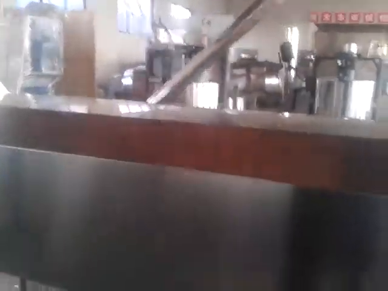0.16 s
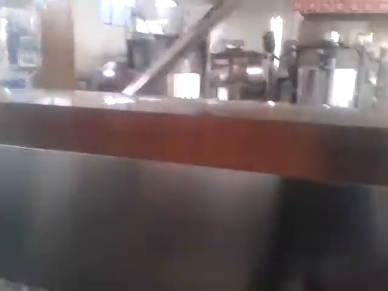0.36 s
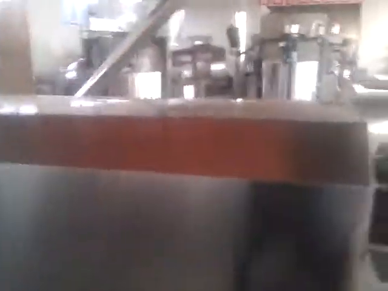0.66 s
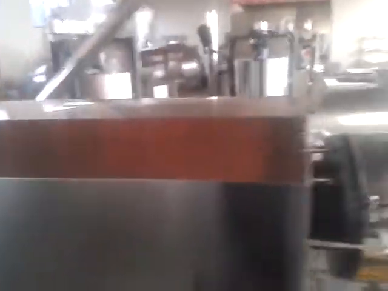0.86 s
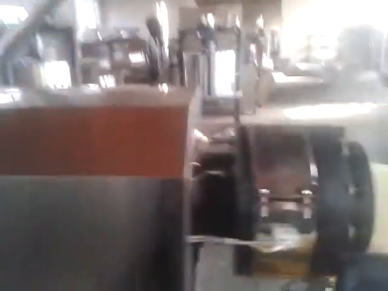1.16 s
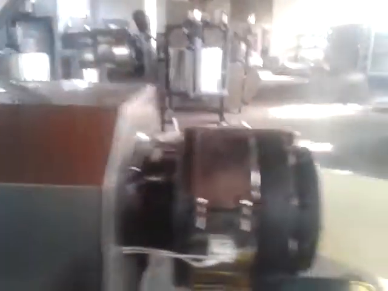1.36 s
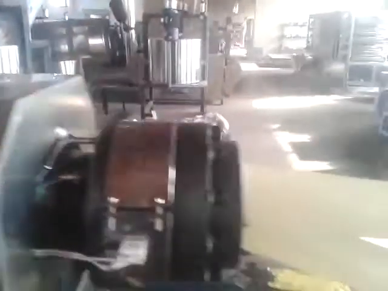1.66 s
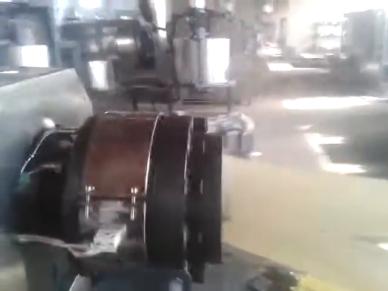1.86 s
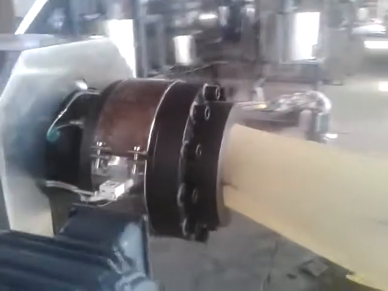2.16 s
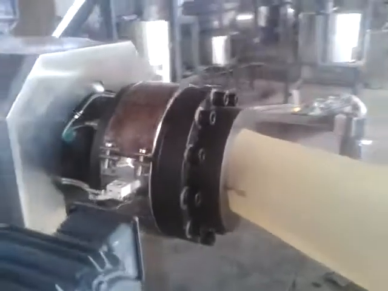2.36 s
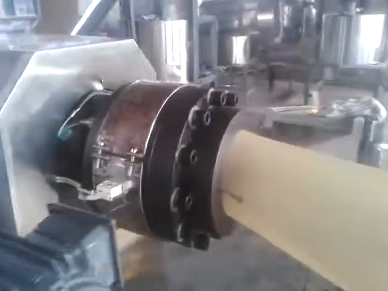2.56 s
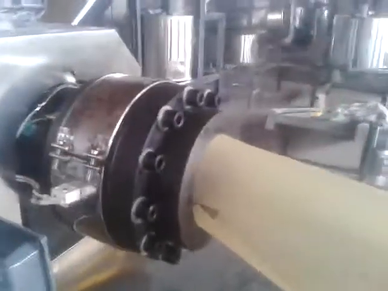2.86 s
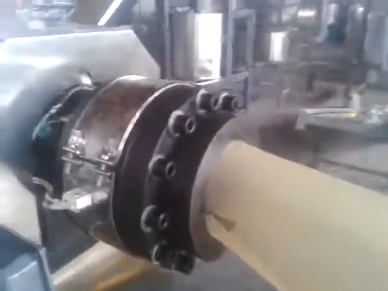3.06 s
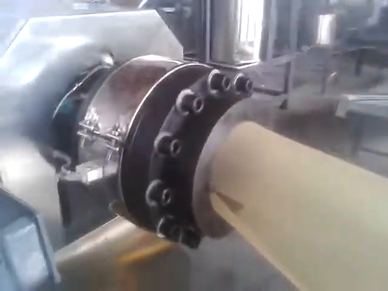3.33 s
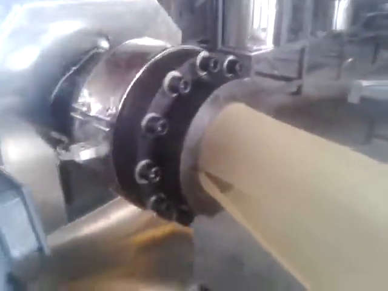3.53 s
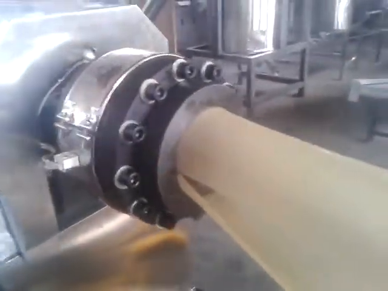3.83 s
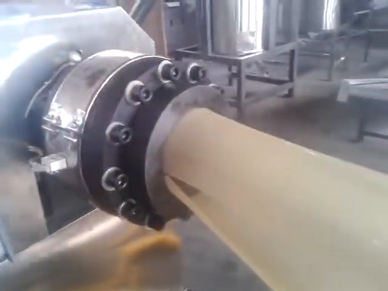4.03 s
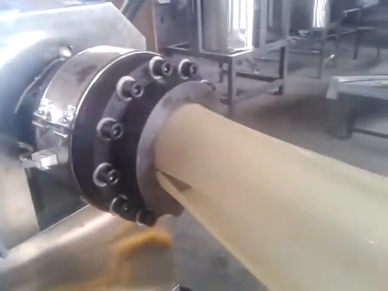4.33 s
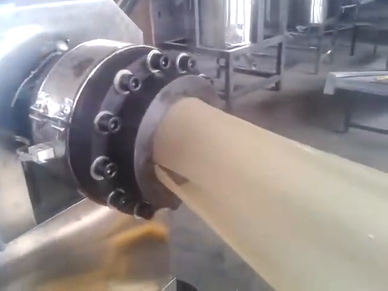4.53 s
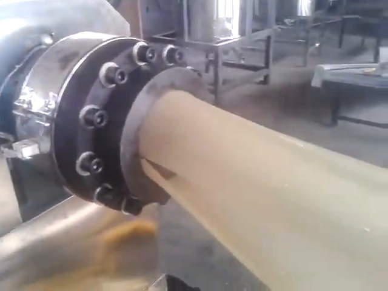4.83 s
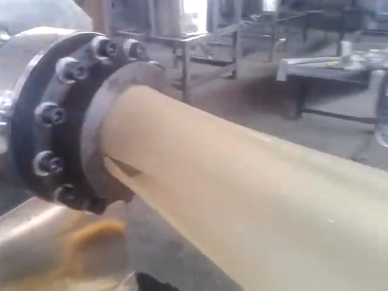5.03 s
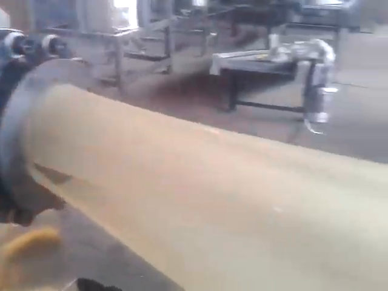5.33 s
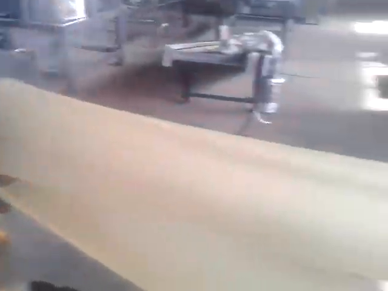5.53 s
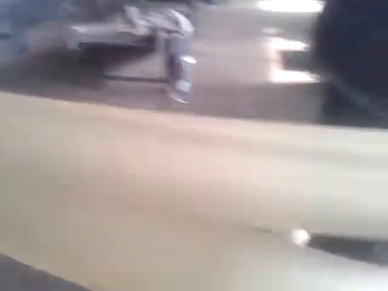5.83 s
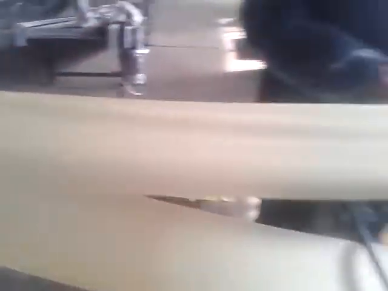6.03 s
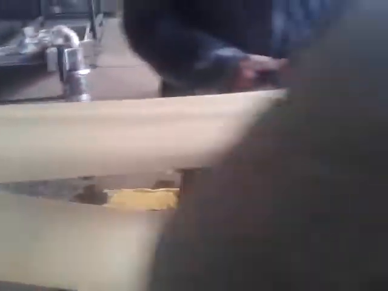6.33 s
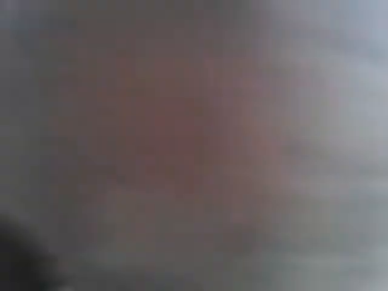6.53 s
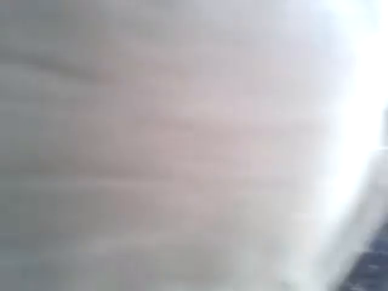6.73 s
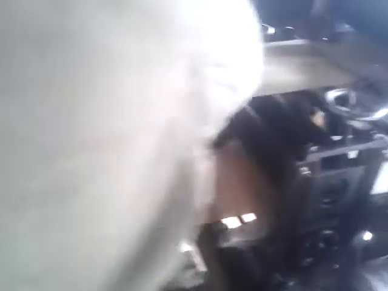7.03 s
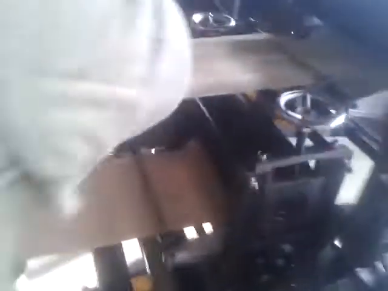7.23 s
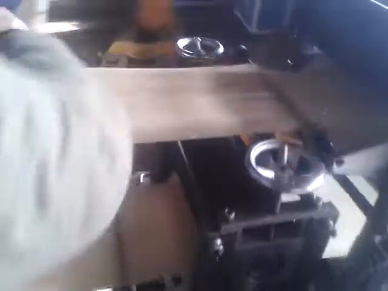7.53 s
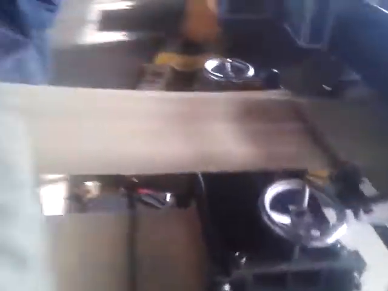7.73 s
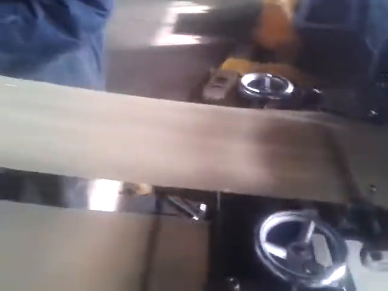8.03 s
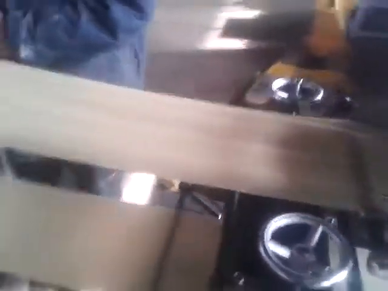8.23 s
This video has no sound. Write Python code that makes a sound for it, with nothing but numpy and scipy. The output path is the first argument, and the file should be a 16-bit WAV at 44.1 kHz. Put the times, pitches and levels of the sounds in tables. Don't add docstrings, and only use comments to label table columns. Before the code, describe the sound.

Continuous loud machinery indoors, captured by a walking phone with thin bass, hard limiting and tiny overload ticks. A piercing electric whine dominates, its tones shimmering unevenly, over a swelling gear hum and rumbling roar. Taps and dull clanks sound distantly around three seconds and again after five. Late on, a higher motor whine and brighter hiss join.

```python
import sys
import numpy as np
from scipy import signal
from scipy.fft import rfft, irfft
from scipy.io import wavfile
from scipy.ndimage import uniform_filter1d, minimum_filter1d

SR = 44100
rng = np.random.default_rng(int(sys.argv[2]) if len(sys.argv) > 2 else 0)


def persist_wave(psi):
    counts = np.round(np.clip(psi, -1, 1) * 32767).astype(np.int16)
    wavfile.write(sys.argv[1], SR, np.atleast_2d(counts).T)


def gain_from_db(level_db):
    decades = np.asarray(level_db, float) / 20
    return 10 ** decades


N = 369988
FRAMES, PAD = 2048, 8192
AIM_MEAN_DB = -42


def column(rows, t):
    s, *values = np.transpose(rows)
    return [np.interp(t, s, v) for v in values]


def read(points, hz):
    f, value = np.transpose(points)
    return np.interp(np.log(hz + 1), np.log(f + 1), value)


def evened(x):
    return x / np.sqrt(np.mean(x ** 2) + 1e-20)


def slow_times():
    return (np.arange(FRAMES) * (N + 2 * PAD) / FRAMES - PAD) / SR


def turned(t):
    turn_s, turn_length_s = 6.44, 0.41
    return .5 + .5 * np.tanh(2 * (t - turn_s) / turn_length_s)


def aim(t):
    # (time [s], level [dB])
    aim_curve = [(0.0, -33), (0.11, -47), (0.21, -36), (0.77, -38), (0.82, -31.5), (0.96, -39), (2.71, -41),
                 (3.9, -38), (3.99, -44), (4.81, -42), (5.61, -39.5), (5.93, -42), (8.3, -46), (8.39, -44)]
    return column(aim_curve, t)[0] - AIM_MEAN_DB


def sway(t, depth_db, top_rate):
    rates = np.geomspace(top_rate / 10, top_rate, num=24)[:, None]
    waves = np.sin(2 * np.pi * (rates * t + rng.random((24, 1))))
    return depth_db * evened((waves / np.sqrt(rates)).sum(0))


def noise(db_field, patchy_db):
    frames, hz = N // 256 + 5, np.fft.rfftfreq(1024, 1 / SR)
    a, b, patches = rng.standard_normal((frames, 513, 3)).T
    patches = uniform_filter1d(patches, size=8, axis=0)
    patches = evened(uniform_filter1d(patches, size=20, axis=1))
    level_db = db_field(hz[:, None], np.arange(frames) * 256 / SR) + patchy_db * patches
    z = (a + 1j * b) * gain_from_db(level_db)
    return signal.istft(z, nperseg=1024, noverlap=768)[1][:N]


def tones(lines, level_db, haze_db, direct=0.21, haze_hz=25, count=8):
    # (time [s], speed [m/s])
    walk = [(0, .4), (1.2, .35), (2.2, .24), (3.5, .2), (3.9, .025), (5.4, .025), (5.9, .3), (6.5, .5),
            (7.1, .3), (7.5, .1), (8.39, .1)]
    sound_speed = 343
    t, size = slow_times(), N + 2 * PAD
    hz, db = np.transpose(lines)
    metres = np.cumsum(column(walk, t)[0]) * (t[1] - t[0])
    angle, start = 2 * np.pi * rng.random((2, len(hz), count, 1))
    angle[:, 0], start[:, 0] = 1.2, 0
    turns_per_metre = 2 * np.pi * hz[:, None, None] / sound_speed
    waves = np.exp(1j * (start + turns_per_metre * np.cos(angle) * metres))
    field = direct * waves[:, 0] + waves.sum(1) / np.sqrt(count)
    gain = gain_from_db(db)[:, None] * field / np.sqrt((abs(field) ** 2).mean(1, keepdims=True))
    if level_db is not None:
        gain *= gain_from_db(level_db) / np.sqrt((abs(gain) ** 2).sum(0))
    offsets = np.fft.fftfreq(FRAMES, 1 / FRAMES).astype(int)
    jitter = rng.standard_normal((len(hz), FRAMES, 2)) @ [1, 1j]
    jitter = np.fft.ifft(np.fft.fft(jitter) * np.exp(-(offsets * SR / size / haze_hz) ** 2))
    group = np.sqrt((abs(gain) ** 2).mean(0) / np.mean(abs(jitter) ** 2))
    haze = gain_from_db(haze_db + 1.03 * (db - db.mean()))[:, None] * group * jitter
    gain = (gain + haze) * signal.windows.tukey(FRAMES, 2 * PAD / size)
    spectrum = np.zeros(size // 2 + 1, complex)
    for f, g in zip(hz, gain):
        at = np.abs(round(f * size / SR) + offsets)
        np.add.at(spectrum, at, np.fft.fft(g) * size / FRAMES / np.sqrt(2))
    return irfft(spectrum, size)[PAD:PAD + N]


def on_comb(lines):
    carrier_hz, motor_hz = 3998.4, 20.6
    hz, db = np.transpose(lines)
    carrier = np.maximum(np.round(hz / carrier_hz), 1) * carrier_hz
    exact = carrier + np.round((hz - carrier) / motor_hz) * motor_hz
    return np.transpose([np.where(abs(exact - hz) < 4, exact, hz), db])


def hiss():
    # (frequency [Hz], level [dB per Hz])
    hiss_colour = [(1800, -17), (2600, -3.5), (4000, 8), (5400, 8), (5900, 2.5), (7000, 6.5), (8800, 5.5),
                   (10400, -4.5), (11200, -5.5), (12700, -11.5), (13000, -4), (14500, -15), (15700, -11),
                   (17000, -14)]

    def field(hz, t):
        level = -44 + 0.33 * aim(t) + 4 * turned(t) + sway(t, depth_db=.5, top_rate=15)
        top = 2.5 + 6.5 * turned(t)
        lift = top * np.clip(hz / 4500 - 2, 0, 1)
        return read(hiss_colour, hz) + level * np.clip(hz / 7000, .6, 1) + lift
    return gain_from_db(-22.5) * noise(field, patchy_db=1.5)


def roar():
    # (frequency [Hz], level [dB per Hz])
    roar_colour = [(24, -95), (40, -65), (91, -57), (114, -64), (145, -14), (280, 1.5), (399, 3), (431, 10),
                   (539, -1), (877, -3), (1120, -8.5), (1920, -15), (2740, -15), (2960, -13.5), (3500, -26),
                   (4550, -45), (7700, -120)]

    def field(hz, t):
        wobble = sway(t, depth_db=0.58, top_rate=30)
        wake = -4.5 * np.exp(-(t / 0.24) ** 2)
        level = -21 - 3.5 * turned(t) + wake + wobble
        bass = -8 - turned(t) + sway(t, depth_db=1.1, top_rate=8)
        upper = -2.5 + .3 * aim(t) + 0.5 * turned(t) - (wobble + wake)
        octaves = np.log2((hz + 20) / 750)
        tilt = bass * np.clip(-octaves, 0, 1) + upper * np.clip(octaves - .4, 0, 1)
        return read(roar_colour, hz) + level + tilt
    return gain_from_db(-8) * noise(field, patchy_db=1.42)


def clanks():
    # (time [s], level [dB], brightness [dB per octave], time to fall 60 dB [s])
    blows = [
        (0.0, -25, -1, .4),
        (1.87, -35, 6, .9),
        (2.238, -26, 4, .25),
        (3.118, -25, 2, 0.33),
        (3.21, -22.5, 3.5, 0.4),
        (3.467, -19.5, -1, 0.65),
        (5.33, -23.5, -1, 0.82),
        (8.136, -23.5, -1, 0.17),
    ]
    # (frequency [Hz], level [dB per Hz])
    clank_colour = [(600, -35), (1500, 3), (2200, 1.5), (4000, 9), (6000, -4), (9000, -24), (15000, -20)]
    t, out = np.arange(SR // 2) / SR, np.zeros(N + SR)
    hz = np.fft.rfftfreq(len(t), 1 / SR)
    for s, db, bright_db, t60 in blows:
        colour = gain_from_db(read(clank_colour, hz) + bright_db * np.log2((hz + 100) / 3000))
        burst = evened(irfft(rfft(rng.standard_normal(len(t))) * colour, len(t)))
        fade = gain_from_db(db - 60 * t / max(t60, .02))
        attack = np.minimum(t / 0.0012, 1) * (1 + 1.2 * np.exp(-t / 0.0094))
        out[round(s * SR):][:len(t)] += burst * fade * attack
    return out[:N]


def gearbox():
    # (centre [s], length [s], level [dB], pitch shift [Hz])
    crests = [(0.414, 0.44, -24.5, 5.5), (0.878, 0.078, -19.5, 1), (1.25, 0.56, -21, -0.03),
              (1.684, 0.46, -16.5, -1), (2.197, 0.18, -27.5, 0.98), (2.6, 0.28, -21.5, 1),
              (3.054, 0.096, -22.5, 1), (3.894, 0.12, -24.5, 1), (4.649, 0.28, -24, -1.5),
              (4.915, .15, -24, -3.5), (5.135, 0.13, -23.5, 4), (5.4, 0.42, -26.5, 0.27),
              (6.222, 0.36, -21, -1), (6.845, .6, -25.5, 0.74), (7.407, 0.24, -24, -0.5),
              (7.822, 0.57, -21, 1.2), (8.303, 0.17, -26.5, 5)]
    # (frequency [Hz], level [dB])
    hum = [(123.5, -63), (126.5, -66), (145.4, -70), (291.5, -44), (457.6, -38), (498, -43), (586, -47),
           (669.5, -42), (725.6, -42), (871, -43), (1017, -46), (1912.4, -58)]
    mesh_hz, mesh_rest_db = 435.5, -38
    t = np.arange(0, N + 200, 100) / SR
    s, length, db, shift_hz = np.transpose(crests)[:, :, None]
    bumps = gain_from_db(db) * np.exp(-(2 * (t - s) / length) ** 2)
    size = gain_from_db(mesh_rest_db) + bumps.sum(0)
    hz = mesh_hz + (bumps * shift_hz).sum(0) / size + sway(t, depth_db=2.0, top_rate=20)
    size = size * gain_from_db(sway(t, depth_db=2.5, top_rate=30))
    hz, size = (np.interp(np.arange(N) / SR, t, v) for v in (hz, size))
    mesh = np.sqrt(2) * size * np.cos(2 * np.pi * np.cumsum(hz) / SR)
    return mesh + gain_from_db(-2.5) * tones(hum, None, haze_db=2, direct=1., haze_hz=7)


def roller_drive():
    # (frequency [Hz], level [dB])
    roller_main = [(4582.5, -38), (4613.5, -38), (4698.3, -36), (4722.5, -36), (4733.3, -24.5),
                   (4819.4, -31), (4853, -34), (4931, -39), (4939.2, -29), (4980, -41), (5049.5, -40),
                   (5064.3, -33), (5103, -41), (5145, -35), (5155.9, -31), (5264.9, -30), (5282.4, -39),
                   (5303.9, -34), (5384.6, -38), (5504.4, -38), (5538, -47), (5624, -48), (5659, -52),
                   (5745, -52), (5783, -52), (5819, -54), (5989, -52)]
    roller_second = [(9755, -55), (9792, -61), (9916, -59), (9959, -53), (9997, -61), (10045, -50),
                     (10088, -55), (10126, -65), (10212, -54)]
    roller_third = [(14880, -76), (14965, -68), (15061, -72), (15150, -71), (15260, -68)]
    t = slow_times()
    main = -27.5 + .25 * aim(t) + 12.5 * turned(t) + sway(t, depth_db=0.2, top_rate=12)
    second = -49.5 + 0.29 * aim(t) + 12 * turned(t) + sway(t, depth_db=1.5, top_rate=8.9)
    return (tones(roller_main, main - 3, haze_db=-8.5)
            + tones(roller_second, second - 3.5, haze_db=-2, haze_hz=70)
            + tones(roller_third, second - 18, haze_db=3, haze_hz=80))


def extruder_drive():
    # (time [s], level [dB])
    whine = [(0.0, -17), (0.04, -10), (0.21, -13), (0.7, -12), (0.77, -18), (0.93, -9), (1.35, -16.5),
             (3.29, -14), (3.5, -17), (4.42, -13), (5.42, -16.5), (6.43, -15.5), (6.75, -19.5), (7.64, -17),
             (7.71, -20.5), (7.87, -16), (7.97, -22), (8.39, -16)]
    # (frequency [Hz], level [dB])
    drive_main = [(3607, -38), (3650, -39), (3688, -41), (3731, -36), (3774, -34), (3811, -35), (3854, -31),
                  (3898, -26), (3935, -26), (3978, -24), (4016, -28), (4059, -23), (4102, -28), (4151, -37),
                  (4183, -32), (4226, -36), (4264, -39), (4307, -38), (4366, -40), (4387, -42), (4430, -45),
                  (4474, -42)]
    # (frequency [Hz], level [dB])
    drive_casing = [(2579, -45), (2740, -48), (2783, -49), (2864, -43), (2907, -40), (2988, -39),
                    (3031, -40), (3112, -40), (3155, -41), (3235, -42), (3278, -45), (3359, -44),
                    (3402, -44), (3483, -42), (3526, -42)]
    # (frequency [Hz], level [dB])
    drive_second = [(7440, -60), (7564, -59), (7687, -59), (7833, -59), (7870, -54), (7913, -56),
                    (7957, -55), (7994, -46), (8037, -54), (8080, -55), (8118, -56), (8161, -58),
                    (8301, -61), (8425, -61)]
    drive_third = [(11504, -64.5), (11892, -64), (11935, -83), (11972, -75), (12016, -68), (12059, -72),
                   (12096, -64), (12484, -64)]
    t = slow_times()
    casing = -27 + 0.38 * aim(t) - 4 * turned(t) + sway(t, depth_db=1.2, top_rate=9)
    second = AIM_MEAN_DB + aim(t) + sway(t, depth_db=1.0, top_rate=7.9)
    third = -48.5 + .7 * aim(t) - 5 * turned(t) + sway(t, depth_db=1.5, top_rate=9)
    main = column(whine, t)[0] + sway(t, depth_db=0.58, top_rate=9)
    return (tones(on_comb(drive_main), main - 1.2, haze_db=-15.5, direct=.33)
            + tones(on_comb(drive_casing), casing - 3.5, haze_db=-14)
            + tones(on_comb(drive_second), second - 2.5, haze_db=-6.5, haze_hz=40)
            + tones(on_comb(drive_third), third - 10, haze_db=4, haze_hz=50.02))


def scene():
    return (hiss() + roar() + clanks() + gearbox() + roller_drive() + extruder_drive())[None]


def starve(x):
    # (low edge [Hz], high edge [Hz], share of moments silenced [0-1],
    # masking by the band below [dB per dB])
    starved = [(8300, 8600, .1, 0), (8600, 8950, .25, 0), (8950, 9300, .35, 0), (9300, 9650, .35, 0),
               (10350, 10550, .3, 1), (10550, 11200, .74, 1.5), (12800, 13450, .54, 0),
               (13450, 14150, .58, 0), (14150, 14850, .58, 0), (14850, 15700, .6, 0)]
    top_hz = 15720
    hz, t, z = signal.stft(x, SR, nperseg=1536, noverlap=768)
    keep = np.ones(z.shape) * (hz < top_hz)[:, None]
    whim_db = rng.standard_normal((len(t), len(starved) + 1))
    whim_db = 4 * whim_db[:, 1:] + 4 * whim_db[:, :1]
    for (low, high, share, masking), whim in zip(starved, whim_db.T):
        band = (hz >= low) & (hz < high)
        below = (hz >= low - 700) & (hz < low)
        level, under = (10 * np.log10((abs(z[0, m]) ** 2).mean(0) + 1e-20) for m in (band, below))
        margin = uniform_filter1d(level - masking * under + whim, size=2)
        keep[:, band] *= margin > np.quantile(margin, share)
    return signal.istft(z * keep, SR, nperseg=1536, noverlap=768)[1][:, :N]


def roll_off(x):
    return signal.sosfilt(signal.butter(12, 17040, fs=SR, output="sos"), x)


def record(dry):
    # (time [s], level [dB])
    overloads = [(.066, -18), (.22, -25), (.345, -17), (.685, -27), (.85, -18), (1.095, -17), (1.38, -17),
                 (1.46, -24), (1.762, -18), (5.89, -28), (7.56, -21), (7.95, -17), (8.375, -21)]
    ceiling = .68
    room_left = np.minimum(.71 / (abs(dry) + 1e-9), 1)
    out = dry * uniform_filter1d(minimum_filter1d(room_left, size=257), size=257)
    out = signal.sosfilt(signal.butter(3, 90, "high", fs=SR, output="sos"), out)
    for s, db in overloads:
        start = round(s * SR)
        out[:, start:start + 9] += gain_from_db(db) * 2 * np.exp(-np.arange(9) / 3)
    mix = starve(np.clip(out, -ceiling, ceiling))
    return roll_off(mix)


dry = scene()
out = record(dry)
persist_wave(out)
```